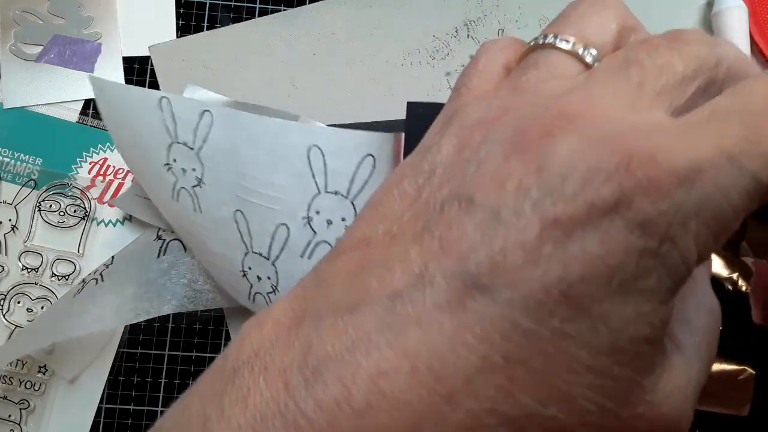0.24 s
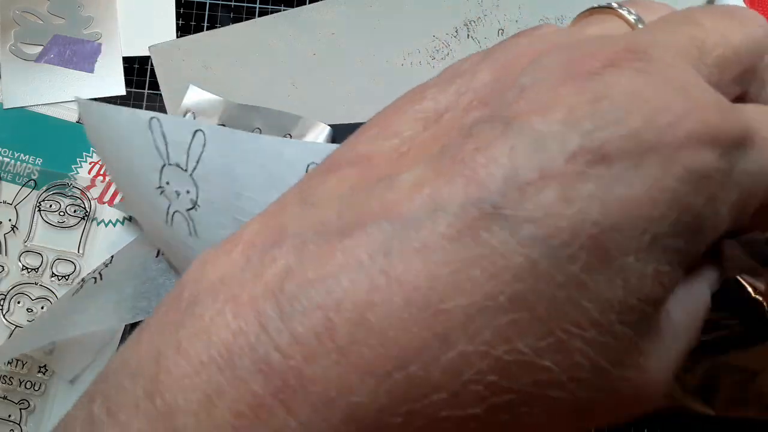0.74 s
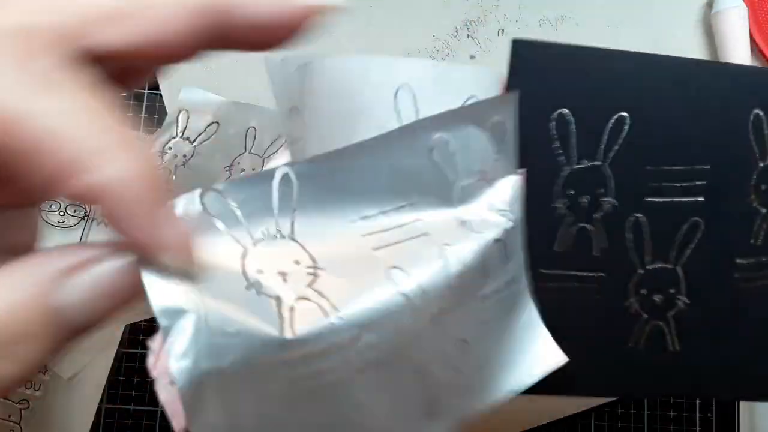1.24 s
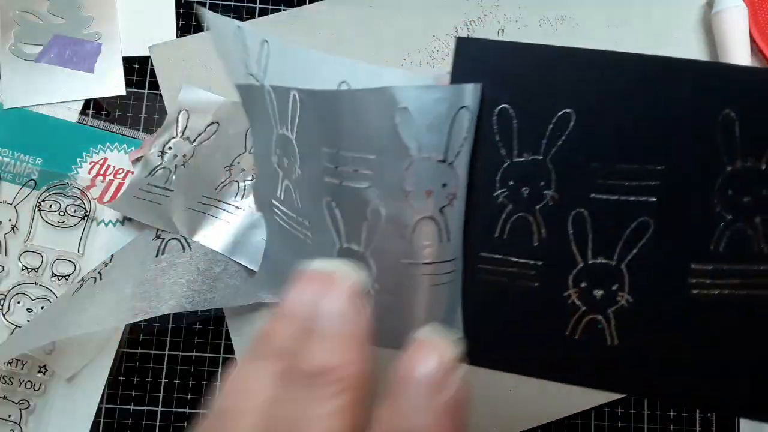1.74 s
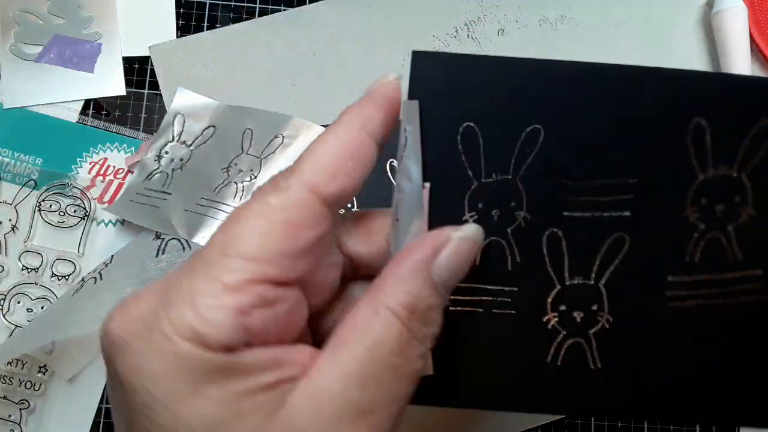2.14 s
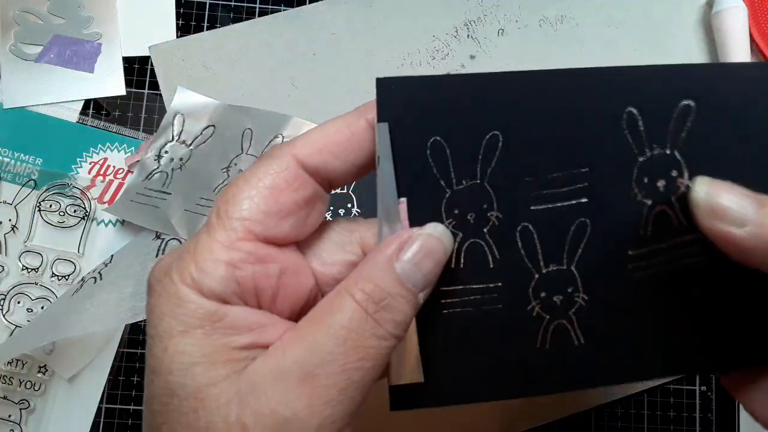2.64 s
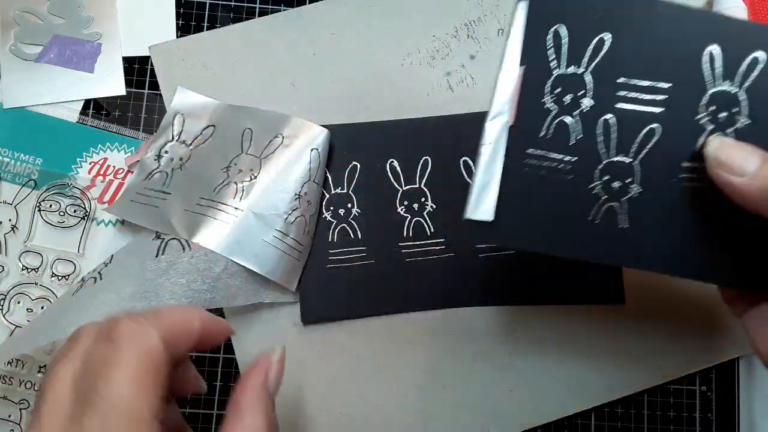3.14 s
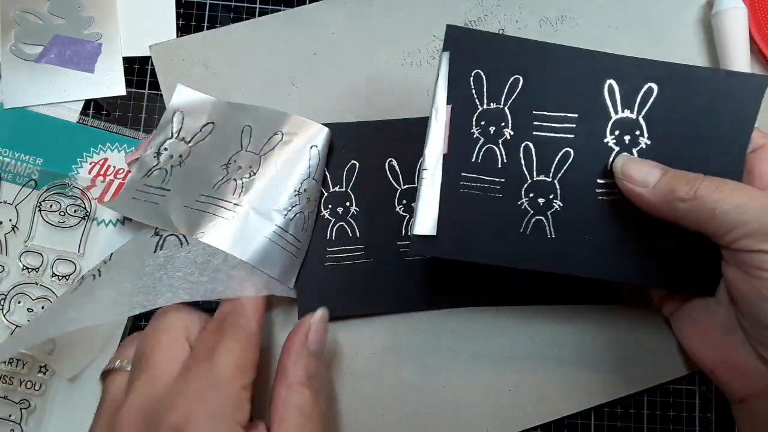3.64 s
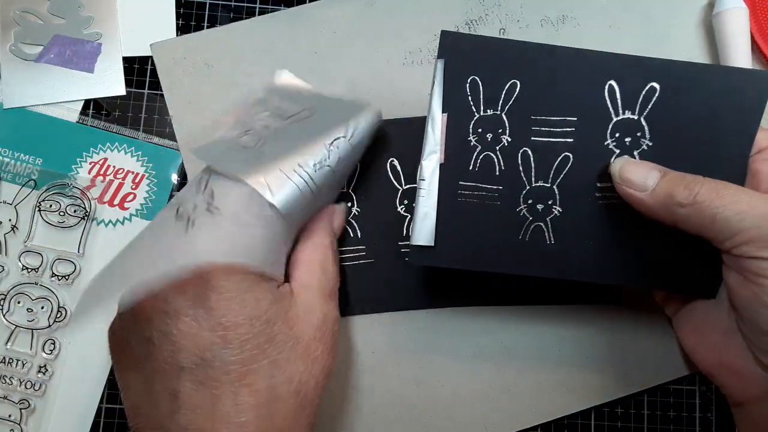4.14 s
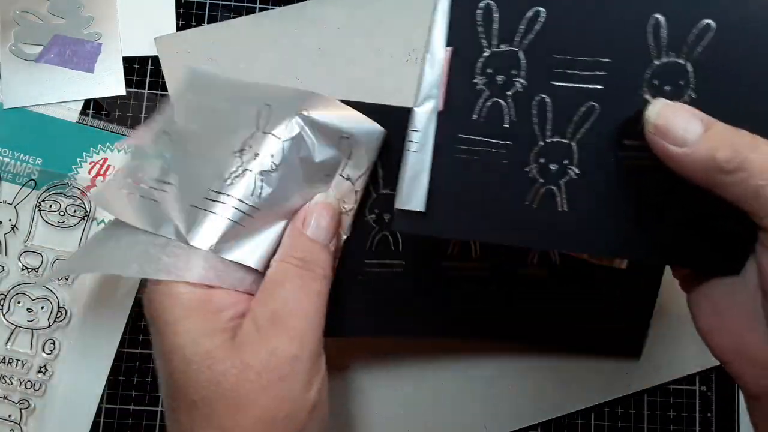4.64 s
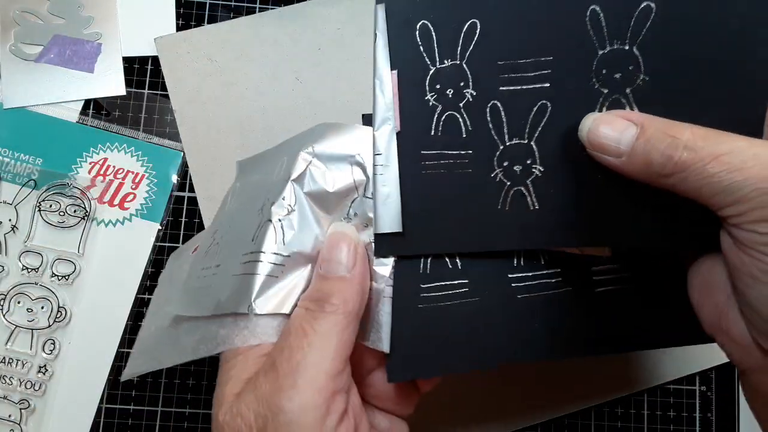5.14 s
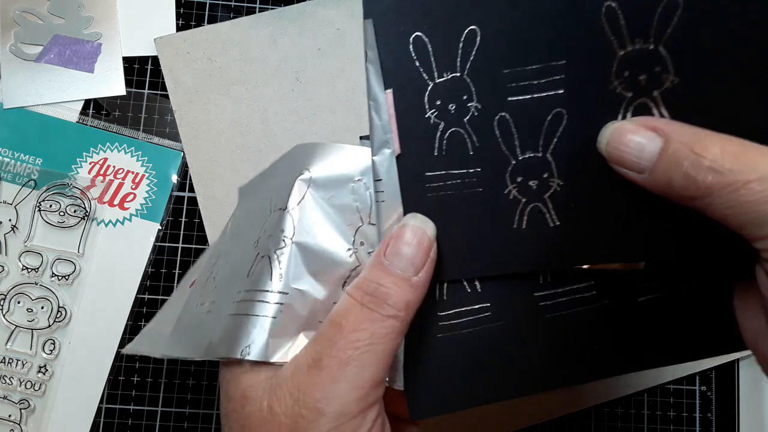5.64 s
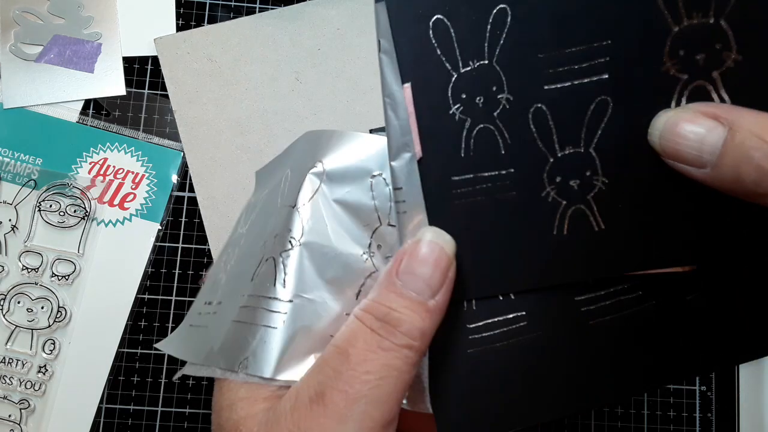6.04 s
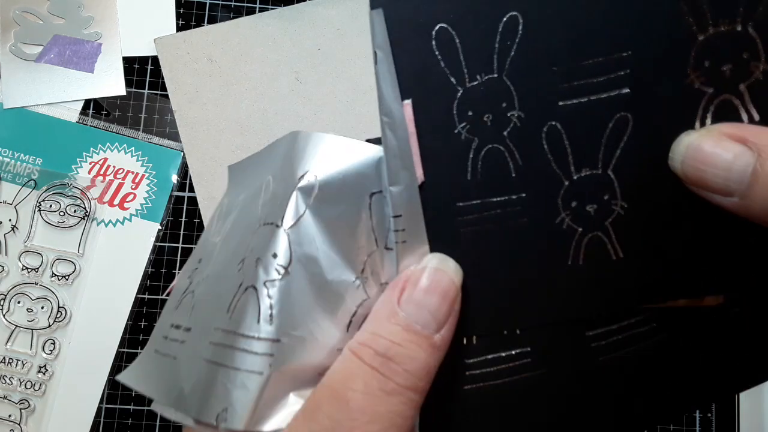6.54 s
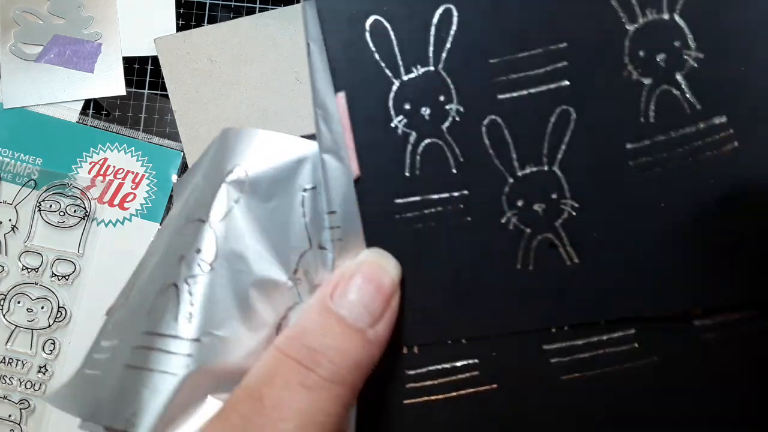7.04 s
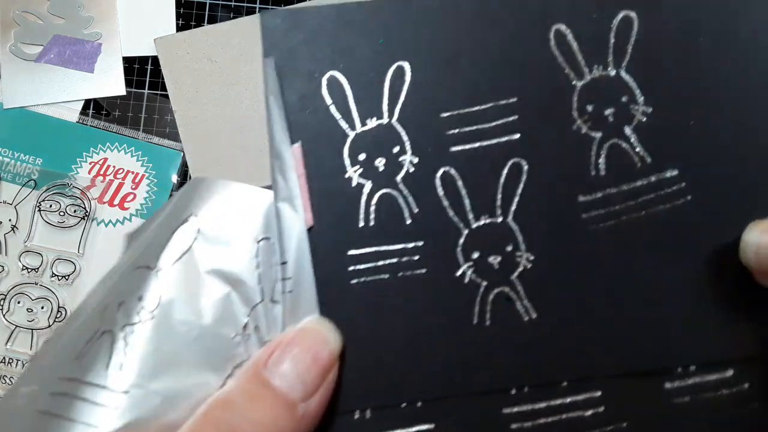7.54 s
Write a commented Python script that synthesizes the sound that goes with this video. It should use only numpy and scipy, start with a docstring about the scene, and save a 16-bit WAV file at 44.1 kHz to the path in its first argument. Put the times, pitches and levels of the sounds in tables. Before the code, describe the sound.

A small, treble-heavy microphone close to a table picks up foil and card being handled. Papery sliding and crackle build to sharp snaps, followed by several dull card taps and a quieter pause. Strong crinkling returns midway, breaking into separate crisp pops, then short juddering scrapes and faint knocks come near the end. Behind it lie soft air noise, faint hum and a very thin whine in a small dry room.

```python
"""Hands peel thin stamping foil off cardstock at a craft table: foil buckles and creases snap, thickly after 1 s.
Past 2 s card is tapped down, ringing its modes above a low thud of the table top; sliding paper fibres
catch and let go all along. From 4 s the foil crackles hard again, and near 7 s card edges judder
in stick-slip rasps between the last taps and pulls. A small microphone with a sharp treble resonance
listens close by throughout, in a small room with low ventilation noise, a faint hum and a thin whine."""
import sys
import numpy as np
from scipy import signal
from scipy.fft import rfft, irfft, next_fast_len
from scipy.io import wavfile
from scipy.ndimage import map_coordinates

SR = 44100
rng = np.random.default_rng(int(sys.argv[2]) if len(sys.argv) > 2 else 0)


def file_out(sig):
    """Save sig as 16-bit WAV at sys.argv[1]."""
    # one column per channel
    cols = np.atleast_2d(sig).T
    # limit, then scale
    lim = np.clip(cols, -1, 1)
    pcm = np.round(lim * 32767).astype(np.int16)
    wavfile.write(sys.argv[1], SR, pcm)


N = 342965
TIME = np.arange(N) / SR


def amp(db):
    """Decibel law: amplitude gain is ten to the power of a twentieth of the level."""
    return 10 ** (np.asarray(db) / 20)


def unit(x):
    """Normalisation: scale to an rms of 1."""
    return x / np.sqrt(np.mean(x ** 2) + 1e-20)


def along(points, hz):
    """Logarithmic pitch scale: read (Hz, value) points between their knots on a log axis."""
    f, v = np.transpose(points)
    return np.interp(np.log(hz + 1), np.log(f + 1), v)


def wobble(rate):
    """Slow random modulation: a smooth curve through random knots, rate a second."""
    return map_coordinates(rng.standard_normal(4096), [TIME * rate], mode="wrap")


def filtered(x, response):
    """Linear filtering: multiply the spectrum of x by a complex response of frequency."""
    m = next_fast_len(len(x) + 4096, real=True)
    spectrum = rfft(x, m) * response(np.fft.rfftfreq(m, 1 / SR))
    return irfft(spectrum, m)[:len(x)]


def coloured(x, spectrum, size=4096):
    """Minimum-phase filtering: a causal filter with the given spectrum keeps attacks sharp."""
    cepstrum = irfft(np.log(amp(along(spectrum, np.fft.rfftfreq(size, 1 / SR)))))
    # fold the cepstrum onto positive time
    cepstrum[1:size // 2] *= 2
    cepstrum[size // 2 + 1:] = 0
    impulse_response = irfft(np.exp(rfft(cepstrum)))
    return signal.fftconvolve(x, impulse_response)[:len(x)]


def resonance(f, centre, width):
    """Damped oscillator: response of one mode, 1 at its centre."""
    return 1j * f * width / (centre ** 2 - f * f + 1j * f * width)


def microphone(x, port_hz=8330, width_hz=760, bass_hz=40):
    """Cavity resonance: the air behind the port rings in the treble; the deepest bass is lost."""
    def response(f):
        port = port_hz ** 2 / (port_hz ** 2 - f * f + 1j * f * width_hz)
        return port * 1j * f / (1j * f + bass_hz)
    return filtered(x, response)


def at_level(x, db):
    """Level at the receiver: scale x so that the microphone picks it up at this rms level."""
    return x * amp(db) / (np.std(microphone(x)) + 1e-12)


def add(track, s, sound):
    """Superposition: mix a sound into the track at time s."""
    start = int(round(s * SR))
    track[start:start + len(sound)] += sound[:N - start]


def grains(rate, spread_db, cap):
    """Random impulse process: rate impulses a second, many small and a few large."""
    at = np.flatnonzero(rng.random(N) < rate / SR)
    sizes = rng.laplace(size=N)[at]
    x = np.zeros(N)
    x[at] = np.sign(sizes) * amp(spread_db * np.minimum(np.abs(sizes), cap))
    return x


# Spectrum of the ventilation noise. Each row: frequency in Hz, relative level in dB.
VENTILATION_SPECTRUM = [(20, -6), (40, -16), (66, -2.5), (92, -13.5), (120, 3), (150, -4), (190, 3),
                        (255, -1), (350, -7.5), (520, -12.5), (1600, -25), (4000, -37), (8000, -59.5),
                        (16000, -23)]


def background():
    """Stationary noise and pure tones: low ventilation noise, a faint mains hum, a thin electronic whine."""
    air = unit(filtered(rng.standard_normal(N), lambda f: amp(along(VENTILATION_SPECTRUM, f))))
    hum = amp(-70) * np.sin(2 * np.pi * 120 * TIME)
    whine = amp(-91) * np.sin(2 * np.pi * 13378 * TIME)
    return amp(-60) * air + hum + whine


# Reverberation of the room. Each row: frequency in Hz, time to fall by 60 dB in seconds.
REVERBERATION_TIMES = [(150, 0.074), (1000, 0.33), (8000, 0.057), (16000, 0.6)]


def room(x, near_db=-13, tail_db=-16):
    """Reverberation: quick reflections from the table top and its clutter, then the room's short tail."""
    hz, t, bands = signal.stft(rng.standard_normal(SR // 2), SR, nperseg=256)
    decay = amp(-60 * t / along(REVERBERATION_TIMES, hz)[:, None])
    tail = signal.istft(bands * decay, SR, nperseg=256)[1]
    t = TIME[:len(tail)]
    near = rng.standard_normal(len(t)) * amp(-60 * t / 0.02) * (t > .0015)
    tail = tail * (t > .006)
    echo = amp(near_db) * near / np.linalg.norm(near) + amp(tail_db) * tail / np.linalg.norm(tail)
    return signal.fftconvolve(x, echo)[:N]


def card(x, modes, corner_hz, order=2):
    """Modal excitation: drive the card's resonances through a contact that softens the treble."""
    def body(f):
        # neighbouring modes alternate in sign
        return sum((-1) ** k * amp(db) * resonance(f, hz, width) for k, (hz, width, db) in enumerate(modes))
    contact = signal.butter(order, min(corner_hz, SR / 4), fs=SR, output="sos")
    return filtered(signal.sosfilt(contact, x), body)


# Resonances of the card lying on the table.
# Each row: frequency in Hz, width in Hz, relative level in dB.
LAID_CARD_MODES = [(74, 27, -2.5), (132, 334, -0.5), (258, 116, 6), (450, 370, -4), (836, 106, 8),
                   (1250, 94, 1.5), (1780, 510, -2.5), (2500, 680, -11.5)]
# Card and fingers meeting the table. Each row: start in seconds, peak level of the knock in dB,
# hardness as treble corner in Hz, flutter's 60 dB decay in seconds, table thud in dB before its soft attack.
TABLE_TAPS = [(2.026, -20, 900, 0.047, -39), (2.129, -26.5, 2150, 0.032, -33),
              (2.168, -21.5, 700, 0.067, -33), (2.371, -21.5, 5500, 0.037, -63),
              (2.789, -37, 450, 0.016, -46), (2.857, -45, 1510, 0.019, -58),
              (7.131, -47, 404, 0.069, -48.5), (7.242, -36, 2200, 0.02, -44),
              (7.385, -32.5, 420, 0.053, -45)]
THUD_HZ, THUD_T60, THUD_ATTACK_S = 72, 0.079, 0.002  # the table top's lowest mode


def taps():
    """Impact: one push and a short flutter of the card on the table, which answers with a low thud."""
    track, t = np.zeros(N), TIME[:SR // 5]
    for s, db, hard_hz, t60, thud_db in TABLE_TAPS:
        contact = 0.1 * rng.standard_normal(len(t)) * amp(-60 * t / t60)
        contact[0] += 1
        knock = card(contact, LAID_CARD_MODES, hard_hz, order=3)
        thud_envelope = amp(thud_db - 60 * t / THUD_T60) * (1 - np.exp(-t / THUD_ATTACK_S))
        thud = thud_envelope * np.sin(2 * np.pi * THUD_HZ * t)
        add(track, s, amp(db) * knock / np.abs(knock).max() + thud)
    return track


# Resonances of the card held in the air.
# Each row: frequency in Hz, width in Hz, relative level in dB.
HELD_CARD_MODES = [(270, 530, -17), (767, 160, -1), (1210, 480, -11.5), (1615, 107, 2), (1950, 146, -6),
                   (3000, 330, -10)]
# Card edge slipping over card. Each row: middle in seconds, rms level in dB at the height of the swell,
# half length in seconds, brightness as treble corner in Hz.
EDGE_SLIPS = [(0.125, -51, 0.011, 3000), (0.194, -43, 0.0096, 2500), (1.019, -40.5, 0.0065, 3480),
              (6.818, -41.5, 0.019, 850), (6.925, -41, 0.0055, 2500), (6.955, -36, 0.0044, 1800),
              (6.968, -31.5, 0.0088, 835), (7.082, -42, 0.012, 2000), (7.094, -32.5, 0.008, 3000),
              (7.113, -25, 0.0028, 3500), (7.128, -29.5, 0.0029, 1300)]


def slips():
    """Stick-slip friction: the card's edge judders in short rasps that ring the held sheet."""
    track, t, lead = np.zeros(N), TIME[:SR // 5], 1 / 20
    for s, db, half, bright_hz in EDGE_SLIPS:
        swell = np.exp(-((t - lead) / half) ** 2 / 2)
        rasp = card(swell * rng.standard_normal(len(t)), HELD_CARD_MODES, bright_hz)
        add(track, s - lead, amp(db) * rasp * np.linalg.norm(swell) / np.linalg.norm(rasp))
    return track


# Each pull or push of the hands. Each row: start in seconds, swell in seconds, easing in seconds,
# drive of the foil crackle in dB, drive of the paper friction in dB.
HAND_STROKES = [(0, 0.0054, 0.17, -61.5, -68.5), (0.117, 0.062, 0.18, -45, -46),
                (0.349, 0.017, 0.12, -41, -49), (0.52, 0.11, 0.115, -39, -53.5),
                (0.688, 0.13, 0.13, -30, -44.5), (0.941, 0.056, 0.026, -28.5, -41),
                (1.06, 0.005, 0.085, -32.5, -47.5), (1.178, 0.13, 0.085, -26.5, -42.5),
                (1.527, 0.061, 0.02, -50.5, -57), (1.75, 0.011, 0.04, -63, -69),
                (1.907, 0.073, 0.16, -31, -42.5), (2.168, 0.0054, 0.4, -41.5, -52),
                (2.583, 0.19, 0.07, -42.5, -52.5), (2.79, 0.07, 0.014, -39.5, -45.5),
                (3.046, 0.005, 0.026, -53, -58.5), (3.579, 0.022, 0.043, -43, -45.5),
                (3.735, 0.1, 0.031, -32.5, -43.5), (3.903, 0.015, 0.095, -39.5, -52),
                (4.085, 0.12, 0.1, -26, -42.5), (4.39, 0.11, 0.15, -29.5, -43),
                (4.52, 0.075, 0.23, -29, -40), (4.818, 0.045, 0.36, -45, -51.5),
                (5.006, 0.064, 0.11, -38.5, -48.5), (5.152, 0.146, 0.26, -40, -44.5),
                (5.481, 0.12, 0.17, -34, -43), (5.764, 0.04, 0.36, -44.5, -53.5),
                (5.958, 0.013, 0.32, -44.5, -49.5), (6.33, 0.03, 0.077, -42.5, -52.5),
                (6.43, 0.0063, 0.17, -38.5, -49), (6.547, 0.068, 0.46, -40.5, -48),
                (6.74, 0.11, 0.014, -37, -41.5), (6.897, 0.066, 0.036, -39, -40.5),
                (7.085, 0.05, 0.024, -43.5, -47.5), (7.27, 0.014, 0.017, -40, -48.5),
                (7.368, 0.086, 0.016, -38, -49), (7.5, 0.034, 0.028, -31.5, -45),
                (7.653, 0.053, 0.039, -32.5, -47)]
EASE_DB, RELEASE_DB_PER_S = -8, 229.5  # the pull slackens by this much, then the sheets settle
TOUCH_FOIL_DB, TOUCH_PAPER_DB = -76.5, -76.5  # sheets merely held still whisper
GRAB_S, GRAB_DB = 0.005, -10  # the fingers take hold within GRAB_S, this far below the stroke's peak


def handling():
    """Energy summation: strokes grab, swell, ease off and settle; gives drive of foil and paper in dB."""
    power = amp([[TOUCH_FOIL_DB], [TOUCH_PAPER_DB]]) ** 2 * np.ones(N)
    for s, swell, easing, foil_db, paper_db in HAND_STROKES:
        since = TIME - s
        shape_db = np.interp(since, [0, swell, swell + easing], [GRAB_DB, 0, EASE_DB])
        shape_db = shape_db - RELEASE_DB_PER_S * np.clip(since - swell - easing, 0, 1)
        grab = np.clip(1 + since / GRAB_S, 0, 1) ** 2
        power = power + (amp([[foil_db], [paper_db]]) * grab * amp(shape_db)) ** 2
    return 10 * np.log10(power)


# Each new grip bends the sheets into a new shape. Each row: start in seconds, main ring in Hz,
# second ring in Hz, ring level in dB, flexing in dB before a 1 dB cut, crispness in dB.
GRIP_SHAPES = [(0, 1250, 860, 2.5, 8, -24), (.68, 1250, 750, 3.5, 2.5, -2.5),
               (1.172, 620, 3600, -12.5, 5, -2.5), (1.9, 706, 3430, -11, 6.5, -1.5),
               (2.45, 750, 3420, -7.5, 9.5, -3.5), (3.55, 610, 1570, -3, -7, -4),
               (3.72, 1250, 1780, 4, -1.5, -6.5), (4.401, 1145, 990, 2.5, -4.5, 1),
               (4.881, 1156, 3100, 3.5, 5.5, 4.5), (5.801, 3000, 660, -4, 2.5, 1.5),
               (6.35, 1660, 780, -35, 3.5, 2), (7.03, 1615, 630, 5, 12.5, -4.5)]


def held(x):
    """Piecewise-constant shape: cut x into one stretch for each grip."""
    return np.split(x, [int(row[0] * SR) for row in GRIP_SHAPES[1:]])


def crispness():
    """Stiffness by shape: crispness in dB of the grip that holds the sheet at each moment."""
    stretches = [np.full(len(part), grip[5]) for grip, part in zip(GRIP_SHAPES, held(TIME))]
    return np.concatenate(stretches)


# Spectrum of rubbing paper fibres. Each row: frequency in Hz, relative density in dB per Hz.
PAPER_SPECTRUM = [(40, -25), (300, -14), (480, -4), (750, 4), (1000, -1.5), (1400, -3), (2200, -2.5),
                  (3300, -3), (5500, -11.5), (15000, -35.5)]
# Spectrum of the sheets' low flexing. Each row: frequency in Hz, relative density in dB per Hz.
FLEX_SPECTRUM = [(30, -26), (80, -2.5), (130, 0.5), (200, 4), (290, -2), (430, -3), (900, -29), (4000, -48)]


def paper(rub_db, main_width_hz=80, second_width_hz=330, catch_t60=0.011):
    """Dry friction: sliding fibres catch and let go; the grip sets how the bent sheets ring and flex."""
    catch_decay = amp(-120 * TIME[:SR // 30] / catch_t60)  # of power, hence twice 60 dB
    catches = signal.oaconvolve(grains(330, spread_db=6.0, cap=2.2) ** 2, catch_decay)[:N]
    fibres = np.sqrt(np.abs(catches) / catches.mean() + 0.52) * rng.standard_normal(N)
    rub = coloured(fibres, PAPER_SPECTRUM)
    flex = coloured(rng.standard_normal(N), FLEX_SPECTRUM)
    stretches = []
    for grip, rubbing, flexing in zip(GRIP_SHAPES, held(rub), held(flex)):
        _, main_hz, second_hz, ring_db, flex_db, _ = grip

        def bent_sheet(f):
            main = 2.08 * resonance(f, main_hz, main_width_hz)
            second = 0.54 * resonance(f, second_hz, second_width_hz)
            return 1 + amp(ring_db) * (main + second)
        sheet = filtered(rubbing, bent_sheet)
        stretches.append((sheet + amp(flex_db - 1.0) * flexing) / np.std(sheet))
    unsteady_db = 2.72 * wobble(45)
    return np.concatenate(stretches) * amp(rub_db + unsteady_db - 1.86)


# Spectrum of the foil. Each row: frequency in Hz, relative density in dB per Hz.
FOIL_SPECTRUM = [(100, -22), (500, -16.5), (1200, 3.5), (2200, -2), (3800, 2.5), (5500, -1.5), (7500, 1.5),
                 (10000, 1.5), (12500, 4), (15500, 5)]


def around(centre_hz, skirt_db):
    """Spectral emphasis: the foil's spectrum, leaning towards one pitch by skirt_db an octave."""
    return [(hz, level - skirt_db * abs(np.log2(hz / centre_hz))) for hz, level in FOIL_SPECTRUM]


def crackle(level_db, count=12, density_power=0.6, top_hz=10500, brightening=0.49):
    """Buckling: tiny facets of foil pop; faster bending makes the pops denser, louder and brighter."""
    effort_db = np.clip(level_db, -55, -22) + 35.5
    density = amp(density_power * effort_db)
    buckles = grains(1400 * density, spread_db=4.0, cap=3.23) / np.sqrt(density)
    facet = rng.integers(count, size=N)
    t, ticks = TIME[:SR // 50], np.zeros(N)
    for k, pitch_hz in enumerate(np.geomspace(3200, 13000, count)):  # each facet has its own brief ring
        ring = rng.standard_normal(len(t)) * amp(-60 * t / rng.uniform(0.0033, 0.022))
        ring = at_level(coloured(ring, around(pitch_hz, skirt_db=3.5)), 0)
        ticks += signal.oaconvolve(buckles * (facet == k), ring)[:N]
    # a taut sheet ticks brightly, a slack one slides with a dull hiss
    crisp_db = crispness()
    slide = amp(-7.5 - crisp_db)
    hiss = at_level(coloured(rng.standard_normal(N), FOIL_SPECTRUM), 0)
    sheet = (at_level(ticks, 0) + slide * hiss) / np.hypot(1, slide)
    top = filtered(sheet, lambda f: 1 - 1 / (1 + (f / top_hz) ** 10))
    sheet = sheet + top * (amp(crisp_db + brightening * effort_db) - 1)
    unsteady_db = 1.8 * wobble(60)
    return sheet * amp(level_db + unsteady_db)


CREASES_PER_S = 16  # further creases, soft or loud with the pull, give way by chance
# level at a middling pull (before the 7 dB cut in snaps), dB per dB of pull, scatter in dB
CREASE_DB, CREASE_GROWS, CREASE_SCATTER_DB = -38.5, 0.71, 3.14
CREASE_S, CREASE_HZ, CREASE_OCTAVES = 0.0011, 6000, 0.43  # typical length and pitch, pitch scatter
MIDDLING_DB = -42  # foil drive during a middling pull
CREASE_OCTAVES_PER_DB = -0.05  # pitch falls as the pull grows


def chance_creases(foil_db):
    """Random snap-through: rows like the placed creases'; harder pulls and crisper grips go louder and lower."""
    at = np.flatnonzero(rng.random(N) < CREASES_PER_S / SR)
    chance = rng.standard_normal((N, 3))[at].clip(-2, 2)
    strain_db = foil_db - MIDDLING_DB + crispness() / 2
    creases = []
    for s, pull_db, (size, length, pitch) in zip(TIME[at], strain_db[at], chance):
        level_db = CREASE_DB + CREASE_GROWS * pull_db + CREASE_SCATTER_DB * size
        octaves = CREASE_OCTAVES_PER_DB * pull_db + CREASE_OCTAVES * pitch
        creases.append((s, level_db, CREASE_S * 2 ** (length / 2), CREASE_HZ * 2 ** octaves))
    return creases


# Creases of the foil snapping through at set times. Each row: start in seconds,
# level in dB before a 7 dB cut, length of the burst in seconds, centre frequency in Hz.
PLACED_CREASES = [(0.2555, -37.5, 0.009, 3000), (0.692, -28.5, 0.009, 8200), (1.066, -28, 0.0057, 10000),
                  (1.1815, -35, 0.0045, 6300), (1.237, -21, 0.0036, 12000), (1.288, -22.5, 0.0011, 11000),
                  (1.298, -25, .002, 6900), (1.3465, -20, 0.0022, 11000), (1.412, -32, 0.0054, 4150),
                  (1.53, -43.5, 0.0021, 3730), (1.6046, -48, 0.0015, 6600), (1.772, -51.5, 0.0016, 5000),
                  (1.908, -27.5, .0045, 7000), (2.229, -37, 0.00055, 9700), (2.2416, -26.5, 0.0022, 6170),
                  (2.3717, -33.5, 0.001, 1590), (2.432, -52, .003, 3830), (2.651, -36.5, 0.0015, 7700),
                  (2.8616, -32, .0016, 4000), (2.9754, -52.5, 0.006, 2730), (3.0485, -39, .0012, 6000),
                  (3.5964, -34, 0.0042, 7040), (3.7255, -36, 0.00074, 8350), (3.736, -39.5, 0.0014, 5940),
                  (3.784, -28, .0014, 9500), (3.827, -30, 0.00092, 4600), (4.003, -39, .0012, 6200),
                  (4.078, -39, 0.0018, 6200), (4.1765, -25.5, 0.0029, 6640), (4.334, -34.5, 0.0015, 10600),
                  (4.3827, -28.5, 0.0046, 6470), (4.449, -28.5, 0.0017, 4780), (4.617, -21.5, 0.0028, 8200),
                  (4.7837, -25, 0.0057, 6500), (4.8477, -29.5, 0.00076, 7000), (4.8834, -30, 0.0023, 10000),
                  (4.9112, -37, .001, 6100), (4.9447, -33, 0.00082, 8800), (4.967, -33, 0.00084, 9900),
                  (5.0228, -31.5, 0.0035, 8600), (5.0875, -42, .001, 3270), (5.1087, -36.5, 0.0013, 2650),
                  (5.232, -38.5, 0.0027, 3450), (5.2664, -25.5, 0.00099, 9900), (5.2926, -25, 0.0025, 8850),
                  (5.3854, -31, 0.0039, 9500), (5.5027, -32, 0.0012, 9300), (5.5494, -26, 0.0022, 11000),
                  (5.659, -26.5, 0.0033, 9100), (5.9652, -25.5, 0.00081, 8140),
                  (6.3437, -35.5, .0017, 4970), (6.4337, -42, 0.0016, 2570), (6.451, -29.5, 0.0009, 7650),
                  (6.5434, -32, 0.00074, 6500), (6.6527, -28.5, 0.0012, 10000), (6.8204, -31.5, .001, 8300),
                  (6.837, -29.5, .0024, 7800), (7.018, -34.5, 0.0013, 7300), (7.287, -30, 0.0034, 6700),
                  (7.4007, -32, 0.0013, 6700), (7.524, -32, 0.0015, 5500)]


def snaps(further_creases, skirt_db=5.0, crack=4.4, shiver_db=-23.5, shiver_t60=0.23):
    """Snap-through: a crease flips with a crack and a burst around its own pitch, then the sheet shivers."""
    track, t = np.zeros(N), TIME[:SR // 25]
    for s, db, length, centre_hz in PLACED_CREASES + further_creases:
        burst = np.exp(-(t / length) ** 2 / 2) + amp(shiver_db - 60 * t / shiver_t60)
        force = burst * rng.choice([-1, 1], len(t))
        force[0] = crack
        focus = np.clip(7000 / centre_hz, .7, 2)  # wide, low panels pop with a clearer pitch
        snap = coloured(force, around(centre_hz, skirt_db * focus))
        add(track, s, at_level(snap, db - 7.0))
    return track


def scene():
    """Superposition: all the handling at the table, its echo and the room's background."""
    foil_db, paper_db = handling()
    card_sounds = taps() + slips()
    foil_sounds = crackle(foil_db) + snaps(chance_creases(foil_db))
    table = card_sounds + paper(paper_db) + foil_sounds
    return (table + room(table) + background())[None]


def record(dry):
    """Band limiting: the resonant microphone, then the recorder's steep cut at 16 kHz."""
    return filtered(microphone(dry[0]), lambda f: 1 / np.sqrt(1 + (f / 16000) ** 240))[None]


dry = scene()
out = record(dry)
file_out(out)
```